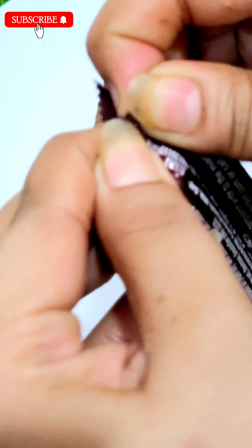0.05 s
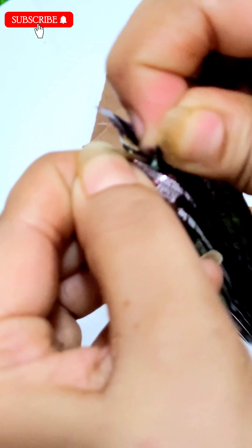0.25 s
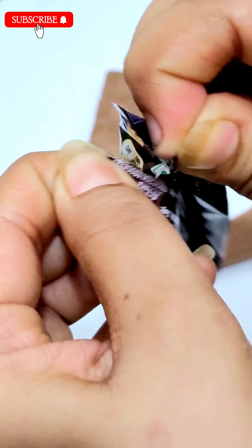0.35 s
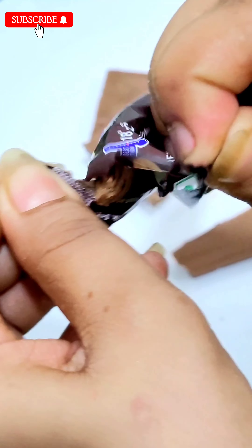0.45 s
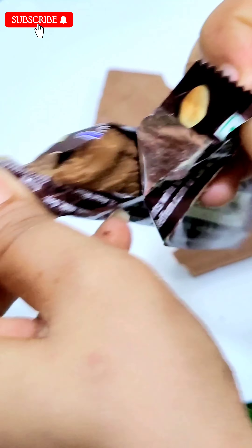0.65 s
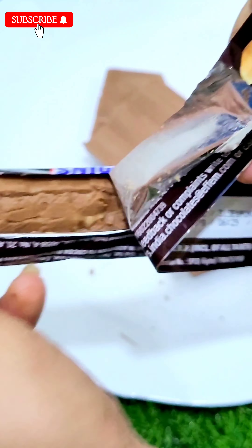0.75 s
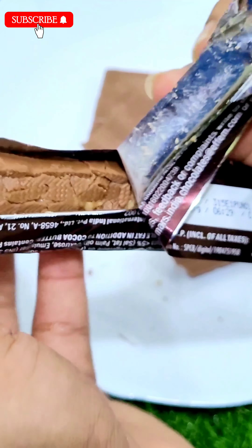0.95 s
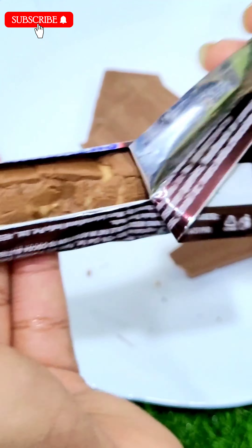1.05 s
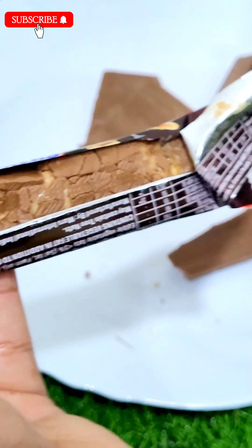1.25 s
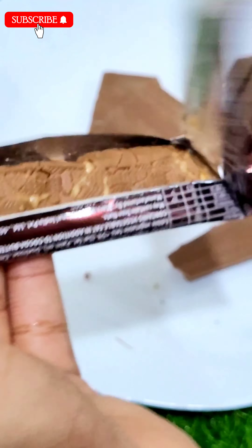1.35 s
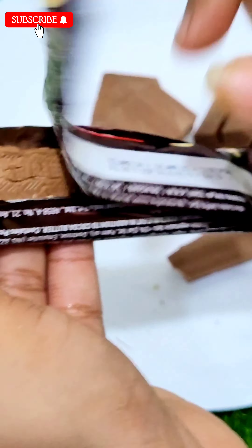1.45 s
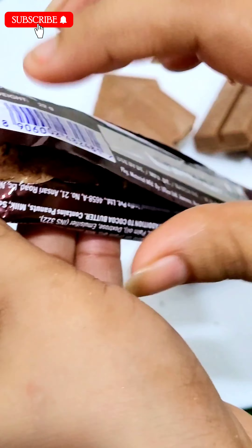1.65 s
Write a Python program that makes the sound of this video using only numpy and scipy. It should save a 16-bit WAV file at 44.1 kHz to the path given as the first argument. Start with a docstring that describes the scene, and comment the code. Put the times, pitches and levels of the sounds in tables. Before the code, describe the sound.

A thin plastic wrapper crinkles and tears open in sharp, crackling bursts close by.

```python
"""Opening a snack wrapper

Fingers pinch a thin plastic wrapper, rip it, pull it open and peel it back, close to the microphone.
The film buckles in sharp snaps over a dense crackle of tiny ones, exciting the hollow resonances of
the half-open pouch. The fingers rub on the bar inside. A small room reverberates and hums faintly."""
import sys
import numpy as np
from scipy import signal
from scipy.fft import rfft, irfft, next_fast_len
from scipy.io import wavfile
from scipy.ndimage import uniform_filter1d

SR = 44100
rng = np.random.default_rng(int(sys.argv[2]) if len(sys.argv) > 2 else 0)


def dump(signal):
    """Clip the signal to [-1, 1] and save it as 16-bit WAV at the path in sys.argv[1]."""
    limited = np.clip(np.atleast_2d(signal).T, -1, 1)
    pcm = np.round(limited * 32767).astype(np.int16)
    wavfile.write(sys.argv[1], SR, pcm)


N = 74970


def snaps():
    """Snap-through buckling: each crack flutters, rings a facet of film and excites the pouch's modes."""
    # Buckles: start_s, level_db, ring_hz, ring_db, hollow_db, sizzle_db, flutter_db (relative levels)
    buckles = [(0.0146, -45.5, 4510, 6, -1, -5, -7), (0.0435, -38.5, 5235, -5.5, -15, 6, -1.5),
               (0.0983, -44, 4910, 0.5, -7, -15, 1), (0.1197, -46, 5800, -5, -16, -2, -9),
               (0.1385, -29, 7260, -1, -24.5, -6, -8), (0.1868, -39, 4840, 0, -18, -12, -17),
               (0.2071, -41, 5570, 0, -10, -7, -5), (0.2104, -30.5, 4338, 4.5, -22, -10, 1),
               (0.2125, -33, 4000, -13, -36, 2, -3), (0.2928, -38.5, 4300, -8, -44, -0.5, 11),
               (0.3, -35, 7100, -10, -23, -3, -4), (0.324, -32.5, 6010, 7, -17, -5, 11),
               (0.336, -36, 7560, 6.5, -11.5, -6, 10), (0.3659, -48, 6040, 13, -21, 9, 8),
               (0.3819, -34.5, 5125, 2, -27, 5.5, -5), (0.436, -33.5, 5360, -3, -39, -7, -3),
               (0.4426, -24, 5070, -8, -24, -14, 1), (0.4531, -23, 5480, -8, -24, -3.5, 11),
               (0.466, -27.5, 7600, -11, -13.5, 0, 5), (0.4755, -26, 4920, -15, -4.5, 1, 1),
               (0.4909, -29.5, 5240, -4, -6.5, 2, -4), (0.527, -23, 4860, 9, -12, -3, 0),
               (0.5318, -18.5, 5300, 4, -15, -13, -14), (0.5734, -37.5, 4870, -5, -1, 1, -14),
               (0.6044, -42, 4900, -6, 3.5, -21, -9), (0.617, -34.5, 4970, -13, -7.5, -21, -2),
               (0.668, -35, 5650, 6, -22, -20, 7), (0.6709, -23.5, 5110, 0.5, -28, -3, 13),
               (0.6778, -38.5, 4670, 5, -2.5, 7.5, -3), (0.6983, -26.5, 4940, -12, -39, -17.5, 3),
               (0.7179, -19, 5335, -7.5, -11.5, -7.5, -1), (0.7312, -22, 5340, -11.5, -4, -5.5, -9),
               (0.7606, -24, 5320, -21, -12, -7, 6), (0.7666, -21.5, 4860, -4, -13.5, -11, -4.5),
               (0.7954, -32.5, 4826, 3.5, -22, 1.5, 1), (0.9131, -42, 4166, 1.5, -22, -11, -4),
               (0.9596, -42.5, 4810, 1, -5, -3, -24), (0.9709, -37, 4660, -3, -38, -3.5, -8),
               (0.9929, -44, 4870, -4, -4.5, -8, -20), (1.0096, -41, 5170, 6, 0.5, 4.5, -5),
               (1.0209, -33, 4590, 0.5, -30, -4, 2), (1.0311, -30.5, 5370, -13, -9.5, -7.5, -2),
               (1.0467, -38, 4560, 6, 1, -23, -1), (1.055, -37, 3260, 3.5, 0.5, -7, -8),
               (1.118, -36.5, 5270, 5.5, 3, -22, 6), (1.1455, -34.5, 5510, -5, -8, 2, 4),
               (1.1515, -29.5, 4990, 1.5, -26, -2, -2.5), (1.165, -25, 4010, -3, -21, -9.5, -9),
               (1.2099, -30, 5200, -1, -9, -5, -2.5), (1.225, -25.5, 5230, -14, -21, -1, -6.5),
               (1.251, -33.5, 4600, 2, -35, -14, 5), (1.2591, -20.5, 7360, -4.5, -17.5, -3.5, -11),
               (1.263, -28.5, 5980, -7, -39, -2.5, -12), (1.3097, -38.5, 5750, -5, -13, 0.5, -1.5),
               (1.394, -33, 7750, -18, -25, -4, -8.5), (1.4008, -40, 4770, 7.5, -47, -21, -2),
               (1.419, -49.5, 3760, 7.5, -6, -8.5, -6), (1.4998, -40, 6140, -1, -21.5, -3.5, 2),
               (1.5661, -48.5, 5560, -1, -16, -8.5, 3.5), (1.5712, -49.5, 4800, -9.5, -11, -4.5, -5),
               (1.6135, -57.5, 6900, 0, -11.5, 0, -1), (1.6177, -56, 6070, 5.5, -16, -7, -17)]
    # Spectra of a snap's body and of its high sizzle: frequency_hz, gain_db
    body_colour = [(1500, -24), (2300, -15.5), (2850, -8.5), (3250, -1.5), (4200, -1), (5500, 1), (6700, 0),
                   (7500, -1), (9000, -10), (14000, -30)]
    sizzle_colour = [(5000, -35), (8500, -8.5), (10200, 2), (11300, 2), (12600, 0), (14000, -0.5),
                     (15800, -6.5)]
    # Damped modes of the pouch: pitch_hz, level_db, decay_s
    pouch_modes = [(347, -10.5, 0.0076), (640, -9.5, 0.0006), (860, -9, 0.0015), (1235, -1, 0.003),
                   (1422, 1.5, 0.0026), (1975, -1, 0.0023)]
    rise_s, crack_s, flutter_rise_s, flutter_s = .00018, .0004, .0015, .003
    ring_s, wander_hz, spread_turns = .0019, 500, .1
    lead, size, span_s = 256, 2048, .004  # samples before the peak, samples in all, level-setting span
    t = (np.arange(size) - lead) / SR
    fade = lambda rise, fall: np.exp(np.minimum(t, 0) / rise - np.maximum(t, 0) / fall)
    stereo_phase = lambda: rng.random() + spread_turns * rng.standard_normal((2, 1))
    out = np.zeros((2, N + 2 * size))
    for start_s, level_db, ring_hz, ring_db, hollow_db, sizzle_db, flutter_db in buckles:
        envelope = np.hypot(fade(rise_s, crack_s), amp(flutter_db) * fade(flutter_rise_s, flutter_s))
        body, sizzle = envelope * rng.standard_normal((2, 2, size))
        pouch = sum(amp(db) * fade(rise_s, decay_s) * np.sin(2 * np.pi * (hz * t + stereo_phase()))
                    for hz, db, decay_s in pouch_modes)
        wander = unit(uniform_filter1d(rng.standard_normal((2, size)), size=14))
        pitch_hz = ring_hz + wander_hz * wander
        facet = fade(rise_s, ring_s) * np.sin(2 * np.pi * np.cumsum(pitch_hz, axis=1) / SR)
        ring = filtered(facet, lambda hz: amp(along(body_colour, hz)))
        snap = (coloured(body, body_colour)
                + amp(ring_db - 1) * unit(ring)
                + amp(hollow_db + 1) * unit(pouch)
                + amp(sizzle_db + 1) * coloured(sizzle, sizzle_colour))
        start = round(start_s * SR)
        out[:, start:start + size] += amp(level_db - 2.5) * np.sqrt(span_s * SR / size) * snap
    return out[:, lead:lead + N]


def crackle():
    """Shot noise: tiny random buckles, each a click with a brief tail, as loud as the hands work."""
    # Envelope of each move of the hands: time_s, level_db
    pinch = [(0, -53), (.13, -62), (.2, -47), (.22, -48), (.27, -56.5), (.32, -56), (.35, -55.5),
             (.43, -55), (.44, -69)]
    rip = [(.43, -47), (.445, -44), (.47, -31.5), (.5, -28), (.535, -24.5), (.56, -40), (.59, -37),
           (.618, -36.5), (.635, -49)]
    pull = [(.69, -74), (.715, -39.5), (.725, -25.5), (.752, -33), (.77, -25.5), (.8, -36), (.83, -41.5),
            (.86, -80), (.91, -75)]
    peel = [(.952, -67), (.962, -39.5), (1.02, -50), (1.055, -43.5), (1.1, -43.5), (1.13, -38),
            (1.16, -31.5), (1.195, -35.5), (1.23, -37), (1.265, -36.5), (1.31, -37.5), (1.33, -56)]
    settle = [(1.32, -69), (1.36, -48), (1.38, -61), (1.397, -37), (1.42, -48.5), (1.455, -66),
              (1.54, -68.5), (1.615, -57), (1.65, -79), (1.7, -97)]
    # Spectra of the crackle in these moves: frequency_hz, gain_db
    light_colour = [(300, 3), (1000, -17), (2400, -3), (3300, -1), (5500, -3), (9000, -7), (15800, -9.5)]
    rip_colour = [(120, -16), (320, -12), (600, -20), (1000, -14.5), (1300, -1.5), (1650, -10), (2000, -1),
                  (2600, -8.5), (3700, 1), (5600, -2), (7000, -4), (9000, -7.5), (12000, -6), (15800, -8.5)]
    pull_colour = [(120, -53), (320, -10), (550, -19), (800, 2.5), (1000, -2), (1230, 7.5), (1700, -2),
                   (2400, -1), (3300, 6), (5400, 3.5), (6800, 1.5), (9000, -2.5), (15800, -3.5)]
    peel_colour = [(150, -18), (400, -8), (800, -1), (1050, -4.5), (1400, -4.5), (1700, -2.5), (2600, -1.5),
                   (3500, 0.5), (5400, 2), (7000, -1), (9000, -4), (15800, -9.5)]
    buckles_per_s, spread_db, decay_s = 2200, 4.5, .0013
    t = np.arange(SR // 100) / SR
    out = np.zeros((2, N))
    for effort, colour in [(pinch, light_colour), (rip, rip_colour), (pull, pull_colour),
                           (peel, peel_colour), (settle, light_colour)]:
        struck = rng.random(N) < buckles_per_s / SR
        sizes = struck * amp(spread_db * np.clip(rng.standard_normal(N), -2, 2))
        tail_power = np.abs(signal.fftconvolve(sizes ** 2, np.exp(-2 * t / decay_s))[:N])
        clicks = sizes * rng.choice([-1, 1], (2, N))
        tails = np.sqrt(tail_power) * rng.standard_normal((2, N))
        out += level(effort) * coloured(unit(clicks) + unit(tails), colour)
    return out


def wrapper_resonance(x):
    """Forced vibration: the wrapper's modes add narrow resonances to the direct sound."""
    # Modes of the pouch and the stretched film: centre_hz, bandwidth_hz, gain_db
    modes = [(1107, 13, -5), (1193, 13, -35), (1368, 20, -6), (2022, 21, -5), (3477, 15, -15),
             (4780, 29, -10.5), (5373, 45, -10), (5405, 35, -4.5), (7560, 31, -16.5)]
    resonator = lambda f, hz, width: 1j * f * width / (hz ** 2 - f ** 2 + 1j * f * width)
    return filtered(x, lambda f: 1 + sum(amp(db) * resonator(f, hz, width) for hz, width, db in modes))


def handling():
    """Friction and soft impact: fingers rub, film slides over the bar and the hand bumps against it."""
    # Envelope of the rubbing: time_s, level_db
    rub = [(0, -54.5), (.06, -60.5), (.076, -45.5), (.135, -54), (.16, -56), (.22, -54.5), (.28, -81),
           (.68, -58.5), (.712, -54), (.724, -47.5), (.75, -67), (.82, -54), (.87, -56), (.94, -65),
           (1.03, -58), (1.048, -38), (1.075, -49.5), (1.2, -45.5), (1.29, -46), (1.335, -62),
           (1.375, -79.5), (1.396, -56.5), (1.45, -64.5), (1.7, -76)]
    # Gaussian swells of the slides and bumps: centre_s, level_db, width_s
    slides = [(0.813, -41.5, 0.016), (1.053, -40, 0.012), (1.183, -49, 0.043)]
    bumps = [(.11, -55, 0.02), (.84, -61.5, 0.042), (1.396, -62.5, 0.0091)]
    # Spectra of the three contacts: frequency_hz, gain_db
    rub_colour = [(60, -53), (170, -18), (240, -2), (300, 1), (380, -3), (480, -10.5), (800, -19.5),
                  (2000, -40.5)]
    slide_colour = [(250, -6.5), (480, 0), (800, 7.5), (1100, -4), (2200, -5), (5000, -53)]
    bump_colour = [(30, -13), (60, -2), (100, 0), (170, -19), (400, -35)]
    t = np.arange(N) / SR
    swells = lambda rows: sum(amp(db) * np.exp(-((t - s) / width) ** 2 / 2) for s, db, width in rows)
    return (level(rub) * noise(rub_colour)
            + swells(slides) * noise(slide_colour)
            + swells(bumps) * noise(bump_colour))


def reverberation(x):
    """Diffuse reflection: a short tail builds up, then each frequency decays at its own rate."""
    # Reverberation times of the room: frequency_hz, t60_s
    decay_times = [(200, 0.2), (1000, 0.32), (4500, 0.3), (15000, .24)]
    build_up_s = .0049
    white = noise([(1000, 0)])[:, :SR // 2]
    hz, t, spectrum = signal.stft(white, SR, nperseg=256)
    decay = amp(-60 * t / along(decay_times, hz)[:, None])
    tail = signal.istft(spectrum * decay, SR, nperseg=256)[1]
    tail *= 1 - np.exp(-(np.arange(tail.shape[1]) / SR / build_up_s) ** 2)
    return signal.fftconvolve(x, tail / np.linalg.norm(tail[0]), axes=1)[:, :N]


def room_hum():
    """Stationary background noise, heard as a hum because its energy lies at low frequencies."""
    # Spectrum of the hum: frequency_hz, gain_db
    hum_colour = [(20, -51), (50, -8.5), (81, -3), (115, -4), (165, -25.5), (290, -10), (500, -26.5),
                  (1000, -28), (4000, -38.5), (15000, -46)]
    return noise(hum_colour)


def coloured(pair, colour):
    """Mid-side mixing: two independent signals become a partly correlated stereo pair, at rms 1."""
    # Likeness of left and right: frequency_hz, correlation
    likeness = [(60, 0.95), (400, 0.85), (800, 0.78), (1300, -0.92), (1800, -0.34), (5500, 0.35),
                (9000, 0.16)]
    angle = lambda hz: np.arccos(np.clip(along(likeness, hz), -1, 1)) / 2
    mid, side = filtered(pair, lambda hz: amp(along(colour, hz)) * [np.cos(angle(hz)), np.sin(angle(hz))])
    return unit(np.array([mid + side, mid - side]))


def noise(colour):
    """Stationary stereo noise with the given spectrum."""
    return coloured(rng.standard_normal((2, N)), colour)


def filtered(x, response):
    """Linear filtering: the spectrum of x times a frequency response."""
    n = x.shape[-1]
    padded = next_fast_len(2 * n)
    return irfft(rfft(x, padded) * response(np.fft.rfftfreq(padded, 1 / SR)), padded)[..., :n]


def level(points):
    """Amplitude envelope through (time_s, level_db) points, silent outside them."""
    s, db = np.transpose(points)
    return amp(np.interp(np.arange(N) / SR, s, db, left=-np.inf, right=-np.inf))


def along(points, hz):
    """Interpolation of (frequency_hz, value) points on a logarithmic frequency axis."""
    frequencies, values = np.transpose(points)
    return np.interp(np.log(hz + 1), np.log(frequencies + 1), values)


def amp(db):
    """Decibels to amplitude ratio."""
    return 10 ** (np.asarray(db) / 20)


def unit(x):
    """Normalisation to rms 1."""
    return x / np.sqrt(np.mean(x ** 2) + 1e-20)


def scene():
    """Superposition of the wrapper's direct sound, its reverberation and the room's hum."""
    reverb_db, hum_db = -11.5, -63.5
    direct = wrapper_resonance(snaps() + crackle()) + handling()
    return direct + amp(reverb_db) * reverberation(direct) + amp(hum_db) * room_hum()


def record(dry):
    """Stereo by level and arrival time: two band-limited microphone ports, the left reached first."""
    # Balance of the ports: frequency_hz, left_over_right_db
    balance = [(100, 0.5), (400, -1.5), (750, 0.5), (1000, 0.5), (1200, -7), (1450, -5), (1800, -1.5),
               (2600, 2), (3700, -2.5), (5000, 3.5), (7300, -2.5), (8500, 2.5), (11500, -4), (15000, 5.5)]
    lag_s, top_hz = .00011, 15900
    sides = np.array([[.5], [-.5]])
    ports = lambda hz: amp(sides * along(balance, hz)) * np.exp(2j * np.pi * hz * sides * lag_s)
    return filtered(dry, lambda hz: ports(hz) * (hz < top_hz))


dry = scene()
out = record(dry)
dump(out)
```